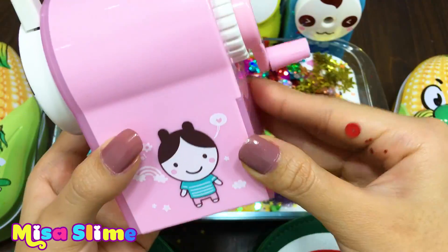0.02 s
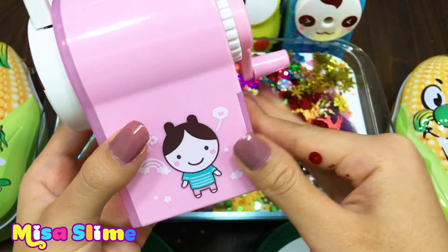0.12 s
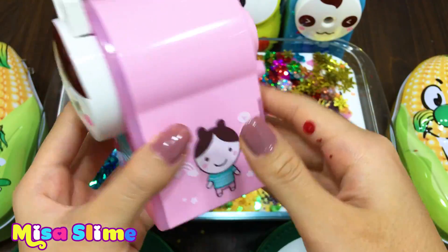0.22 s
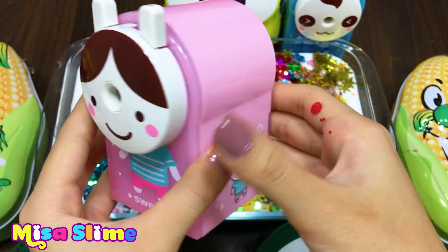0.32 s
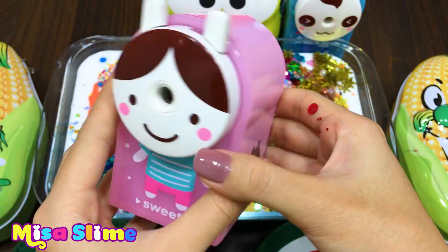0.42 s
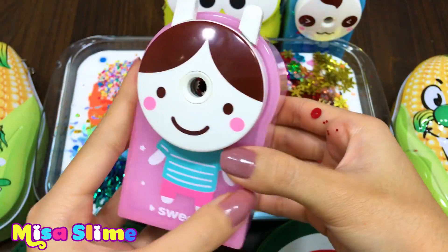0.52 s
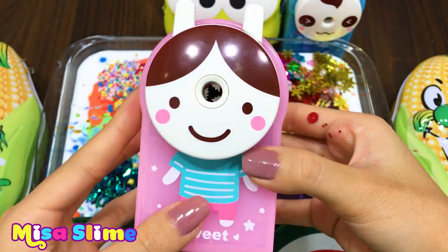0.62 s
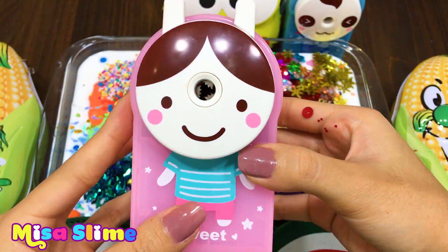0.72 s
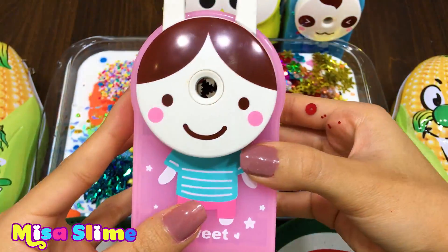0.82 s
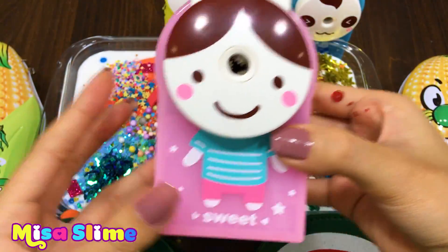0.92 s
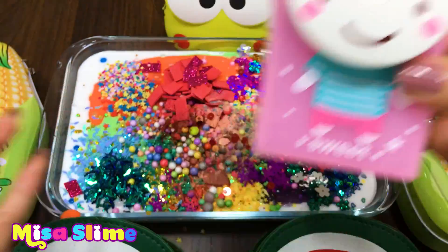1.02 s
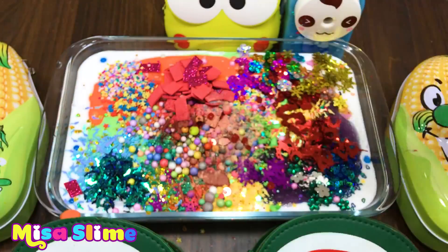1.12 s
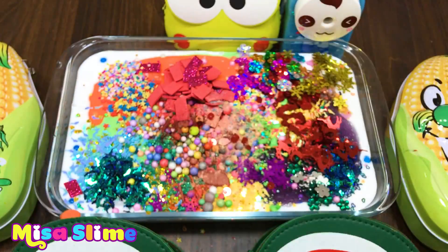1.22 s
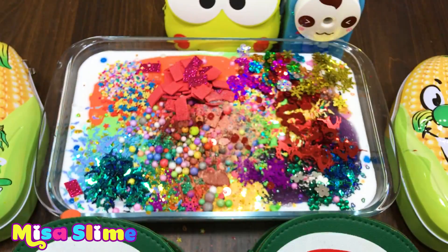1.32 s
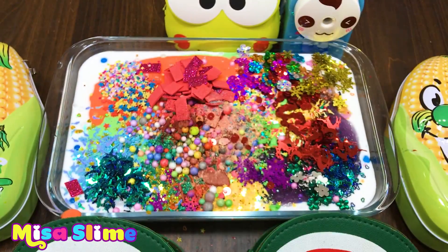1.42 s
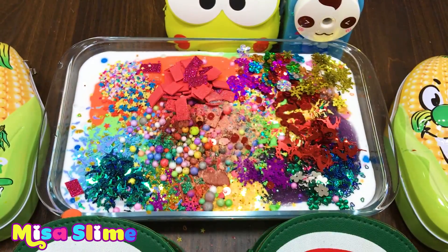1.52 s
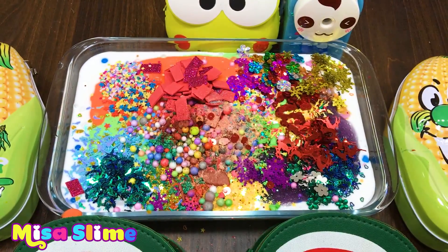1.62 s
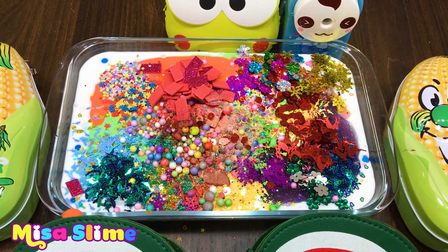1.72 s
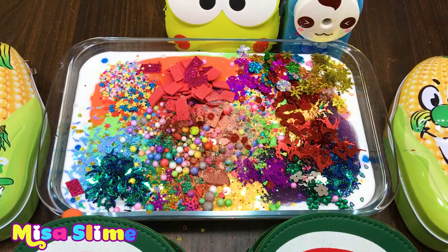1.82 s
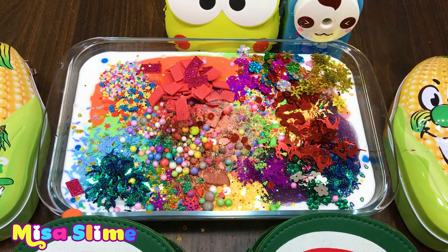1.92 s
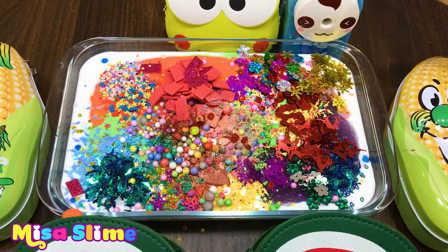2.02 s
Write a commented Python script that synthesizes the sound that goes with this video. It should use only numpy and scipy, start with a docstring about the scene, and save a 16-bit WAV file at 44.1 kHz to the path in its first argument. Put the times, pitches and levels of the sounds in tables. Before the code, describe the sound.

A hollow plastic case is handled close to the microphone in a bare, echoing room. Faint knocks and a slight sliding whistle begin, a quick rattle starts near 0.2 seconds, and a loud, bright snap and knock land at 0.25 to 0.27. Lighter taps, ticks and finger rustles follow from 0.5 to 0.9, fainter ones around 1.2, and small clicks at 1.5 to 1.7, over low rumble and faint hiss.

```python
"""A bare echoing room: hands turn a hollow plastic case close to the microphone and push its drawer shut.
A short rattle, a snap and a knock are heard, then smaller knocks and ticks as it is carried off.
Contacts ring decaying wall and edge modes, and thumps are decaying sines; all of these feed a noise-tap echo.
Resonant noise whistles as the drawer slides, grainy noise makes the fingers rustle,
and shaped noise makes the room's low rumble and faint hiss."""
import sys
import numpy as np
from scipy import signal
from scipy.fft import rfft, irfft
from scipy.io import wavfile
from scipy.ndimage import uniform_filter1d

SR = 44100
rng = np.random.default_rng(int(sys.argv[2]) if len(sys.argv) > 2 else 0)


def gain_from_db(level_db):
    """Convert decibel levels to linear amplitude factors (20 dB per decade)."""
    decades = np.asarray(level_db, float) / 20
    return 10 ** decades


def generate_wav(signal):
    """Clip the signal to [-1, 1] and save it as 16-bit WAV at the path in sys.argv[1]."""
    frames = np.transpose(np.atleast_2d(signal))
    scaled = np.clip(frames, -1, 1) * 32767
    pcm = np.round(scaled).astype(np.int16)
    wavfile.write(sys.argv[1], SR, pcm)


N = 92610  # samples, 2.1 s
LEAD = 22050  # samples kept ahead of the start, so that an earlier knock can still echo


def evened(x):
    """Scales a signal to an rms of one."""
    return x / np.sqrt(np.mean(x ** 2) + 1e-20)


def read(points, hz):
    """Reads a curve of (Hz, value) points along log frequency."""
    f, value = np.transpose(points)
    return np.interp(np.log(hz + 1), np.log(f + 1), value)


def add(mix, start_s, sound):
    """Lays a sound into a mix that begins LEAD samples early."""
    part = mix[LEAD + round(start_s * SR):][:len(sound)]
    part += sound[:len(part)]


def strike(modes, peak_db, hz, patch_db, reach_oct, far_db, chatter_s, crack_db, blur=1):
    """A contact and three weaker rebounds crack, ring the struck patch and the modes near it, each a close triple."""
    crack_fade_s, crack_top_hz = 0.0015, 11000
    patch_cycles = 35  # the patch falls by 60 dB in this many cycles, times blur
    mode_split = 0.018  # largest detuning either way, as a share of the mode frequency
    radiates_above_hz = 650  # thin walls move no air below this
    t = np.arange(1600) / SR

    f, mode_db, t60 = np.transpose(modes * 3)[:, :, None]
    luck = rng.random((len(f) + 4, 2))
    near = np.exp(-.5 * (np.log2(f / hz) / reach_oct) ** 2) + gain_from_db(far_db)
    detune = 1 + 2 * mode_split * (luck[4:, :1] - .5)
    uneven_db = 6 * (luck[4:, 1:] - .5)
    fading = gain_from_db(mode_db + uneven_db - 60 * t / t60 / blur)
    ring = (near * fading * np.sin(2 * np.pi * f * detune * t)).sum(0)

    patch = gain_from_db(patch_db - 60 * t * hz / patch_cycles / blur) * np.sin(2 * np.pi * hz * t)
    crack_band = signal.butter(2, [2500, crack_top_hz], "band", fs=SR, output="sos")
    crack = signal.sosfilt(crack_band, rng.standard_normal(len(t)))
    crack = gain_from_db(crack_db) * np.exp(-t / crack_fade_s) * crack
    touch = ring / abs(ring).max() + patch + crack

    at = np.cumsum(.4 + luck[:4, 0]) * chatter_s * blur * SR
    contacts = np.zeros(int(at[-1]) + 2)
    force = 0.72 ** np.arange(4) * (0.81 + 0.29 * luck[:4, 1])
    np.add.at(contacts, (at - at[0]).astype(int), force)
    radiation = signal.butter(3, radiates_above_hz, "high", fs=SR, output="sos")
    sound = signal.sosfilt(radiation, np.convolve(contacts, touch))
    return gain_from_db(peak_db) * sound / abs(sound).max()


def strikes(direct, sent):
    """Knocks ring the wall modes, ticks and catch snaps the edge modes, each heard directly and through the room."""
    # drawer catch snapping and rebounding: start_s, peak_db, ring_hz, room_share_db (before the lift below)
    snaps = [(0.2448, 2, 10200, -15.5), (0.2445, -1, 10800, -13), (0.2476, -4.5, 10790, -11.5),
             (0.2506, -17, 11500, -10), (0.2742, -12.5, 7870, -12)]
    # knocks on the case walls: start_s, peak_db, struck_region_hz, room_share_db (before the lift)
    knocks = [(.0005, -30, 1690, 2), (.0232, -29, 2000, -3.5), (.0234, -32, 950, 0), (.096, -35, 1050, 1),
              (.1038, -33.5, 1300, -5), (.123, -43, 1290, -7), (.184, -33, 1780, -13),
              (.1925, -26.5, 1306, 4), (.199, -19.5, 2000, -9.5), (.203, -23.5, 2099, -4),
              (.217, -24, 1805, 0), (.2205, -11, 2050, -12), (.2245, -17.5, 1970, 0.5),
              (.231, -24.5, 2043, -9), (.2415, -18, 2032, -36), (.2452, -11, 1114, -7),
              (.2468, -2.5, 1640, -16.5), (.2588, -9, 2379, -11.5), (.2612, -13, 2198, -9),
              (.2718, -8.5, 1292, -17), (.2720, -8, 2820, -11), (.2735, -11, 2227, -7),
              (.2748, -14.5, 1300, -11.5), (.574, -33, 1170, -27), (.584, -35.5, 1520, -11.5),
              (.595, -29.5, 1498, -9.5), (.601, -42, 1570, -2), (.647, -43.5, 1480, -10),
              (.720, -33, 2132, -10), (.740, -48, 1580, -10.5), (.768, -32, 1480, -10.5),
              (.785, -37, 1297, -12.5), (.905, -47.5, 1646, -13.5), (.933, -51, 1404, -25),
              (1.162, -55.5, 1351, 0), (1.183, -55.5, 1100, -11.5), (1.198, -49.5, 2200, -2.5),
              (1.243, -53, 1376, -13.5), (1.257, -47.5, 1338, -9.5), (1.266, -45, 2067, -11.5),
              (1.364, -52, 990, -2), (1.44, -53.5, 1407, 2.5), (1.510, -38, 1586, -1.5),
              (1.550, -38, 1254, -5.5), (1.663, -32.5, 1900, -7.5), (1.676, -42.5, 1930, -2.5),
              (1.691, -39, 1880, -5.5), (1.702, -55, 1930, 5), (1.722, -47.5, 1890, -3)]
    # bright ticks of edges and loose sequins: start_s, peak_db, ring_hz, room_share_db (before the lift)
    ticks = [(.0944, -44.5, 5200, 4), (.139, -38.5, 6240, -11.5), (.1435, -37.5, 6300, -9),
             (.1518, -35.5, 6540, -2), (.1918, -35, 4900, -10), (.199, -32, 4500, 2),
             (.2208, -26, 5433, -2.5), (.237, -30, 5760, -10), (.2588, -20, 4040, -25),
             (.2718, -16, 3817, -12.5), (.526, -43, 11500, -10), (.574, -44, 5130, -20),
             (.601, -32.5, 6900, -5.5), (.720, -35.5, 4600, -13.5), (.740, -47, 4500, -10.5),
             (.768, -50.5, 5100, -8), (.7845, -26.5, 6120, -12.5), (.785, -34, 4200, -4),
             (.931, -48, 4100, -15), (.932, -45.5, 9020, -15), (1.1614, -60, 4570, -3),
             (1.2425, -44, 11480, -13.5), (1.257, -45.5, 5350, -17), (1.257, -45, 11500, -12),
             (1.268, -48, 4053, -13.5), (1.510, -32, 8080, -5), (1.543, -41, 4380, -6),
             (1.663, -39, 4820, -9.5), (1.663, -34, 9300, -4), (1.689, -46, 7130, -3),
             (2.0834, -72.5, 5320, -9.5)]
    # wall modes of the case: pitch_hz, relative_level_db, t60_s (before blur)
    walls = [(640, -17, 0.024), (950, -25, .03), (1103, -4.8, 0.024), (1160, -0.5, 0.03),
             (1480, -3.1, 0.016), (1640, 9.5, 0.012), (1920, 10, 0.021), (2154, 13, 0.023),
             (2620, 9.5, 0.013), (2860, 7.5, 0.0075)]
    # edge modes: pitch_hz, relative_level_db, t60_s (before blur)
    edges = [(3330, 0, 0.0026), (4200, 4.5, 0.019), (4920, 4.5, .007), (5400, -3.5, 0.0062),
             (5900, 4.5, 0.005), (6724, 5.5, 0.011), (7700, -3.5, 0.002), (8600, -4.5, 0.0055),
             (9200, -2, 0.005), (10860, -1, 0.0054), (10400, -2.5, 0.0059), (12500, -4, 0.0017),
             (13600, -9, .005), (15000, -6.5, .005)]
    knock = dict(far_db=-21.5, chatter_s=.0012, crack_db=-26)
    tick = dict(far_db=-18.5, chatter_s=.0006, crack_db=-10.5)
    knock_reach_oct, tick_reach_oct = 0.3, 0.063
    patch_db, room_patch_db = -8.5, -6
    room_lift_db = 2.5
    # the room hears all sides of the case: more modes, less distinct
    room_reach, room_blur = 1.7, .45

    # a knock just before the start, heard through the room alone
    earlier_s = 0.38
    add(sent, -earlier_s, strike(walls, -12, 2000, patch_db, knock_reach_oct, **knock))
    add(sent, -earlier_s, strike(edges, -22, 5700, patch_db, tick_reach_oct, **tick))

    kinds = (knocks, walls, knock_reach_oct, knock), (ticks + snaps, edges, tick_reach_oct, tick)
    for rows, modes, reach_oct, touch in kinds:
        for start_s, peak_db, hz, room_share_db in rows:
            add(direct, start_s, strike(modes, peak_db, hz, patch_db, reach_oct, **touch))
            sent_db = peak_db + room_share_db + room_lift_db
            wide_oct = room_reach * reach_oct
            add(sent, start_s, strike(modes, sent_db, hz, room_patch_db, wide_oct, **touch, blur=room_blur))


def thumps(direct, sent):
    """The whole case thumps dully in the hand: low sines with a quick onset and an even decay."""
    # start_s, level_db (before onset, decay and low cut), pitch_hz
    thump_rows = [(0.199, -42, 460), (0.222, -33, 420.3), (0.244, -25, 445.3), (0.271, -18, 268),
                  (0.538, -40, 294), (0.576, -34.5, 308), (0.6, -41.5, 274), (0.766, -43.5, 340),
                  (0.785, -46.5, 440), (0.914, -61.5, 254.6)]
    t60_s, onset_s = .028, 0.001
    t = np.arange(6000) / SR
    low_cut = signal.butter(2, 140, "high", fs=SR, output="sos")
    for start_s, level_db, hz in thump_rows:
        sound = gain_from_db(level_db - 60 * t / t60_s) * np.sin(2 * np.pi * hz * t)
        sound = signal.sosfilt(low_cut, sound * np.minimum(t / onset_s, 1))
        add(direct, start_s, sound)
        add(sent, start_s, gain_from_db(-10) * sound)


def case():
    """Every knock, tick, snap and thump of the case, once as heard directly and once as sent to the room."""
    direct, sent = np.zeros((2, LEAD + N))
    strikes(direct, sent)
    thumps(direct, sent)
    return direct, sent


def slide():
    """The sliding drawer makes the hollow whistle faintly: noise through one gliding resonance, applied twice."""
    # start_s, level_db (before the trim), pitch_hz
    glide = [(0, -39, 2010), (.026, -37, 1920), (.056, -49.5, 1986), (.174, -51.5, 2000),
             (.19, -37.5, 2050), (.204, -35.5, 2080), (.212, -48, 2030), (.224, -33.5, 1980),
             (.24, -45, 1970)]
    width_hz, trim_db = 140, -2.5  # width of a single pass
    start_s, level_db, pitch_hz = np.transpose(glide)
    t = np.arange(int(start_s[-1] * SR)) / SR
    turn = np.exp(2j * np.pi * np.cumsum(np.interp(t, start_s, pitch_hz)) / SR)
    r = np.exp(-np.pi * width_hz / SR)
    # the noise is turned down to 0 Hz, narrowed there, and turned back up to the moving pitch
    narrow = signal.lfilter([1], np.convolve([1, -r], [1, -r]), rng.standard_normal(len(t)) / turn)
    whistle = evened((turn * narrow).real)
    level = gain_from_db(trim_db + np.interp(t, start_s, level_db))
    return np.pad(level * whistle, (0, N - len(t)))


def rubs():
    """Fingers slide on plastic: dense tiny slips over a smooth hiss, in short strokes of their own brightness."""
    # start_s, length_s, level_db (rms before stroke shape and unevenness), centre_hz
    strokes = [(0.083, .012, -61, 7900), (0.141, .026, -59.5, 6000), (0.463, 0.12, -53.5, 10060),
               (0.589, .025, -58.5, 7660), (0.719, 0.063, -67, 8960), (0.891, .025, -64, 11000),
               (1.358, 0.028, -68, 5900), (1.438, 0.04, -66.5, 9400), (1.664, 0.057, -58, 7500),
               (1.716, 0.095, -64, 977), (2.057, .03, -82, 9110)]
    grains_per_s, grain_db = 9000, 2.5
    smooth = 1  # hiss against slips
    width_oct, fade_s, uneven_db = 0.77, .006, 3

    size = gain_from_db(grain_db * np.minimum(rng.exponential(1, N), 5)) * rng.standard_normal(N)
    slips = evened(size * (rng.random(N) < grains_per_s / SR))
    spectrum = rfft(slips + smooth * rng.standard_normal(N))
    hz = np.fft.rfftfreq(N, 1 / SR) + 1
    t = np.arange(N) / SR
    out = np.zeros(N)
    for start_s, length_s, level_db, centre_hz in strokes:
        colour = np.exp(-.5 * (np.log2(hz / centre_hz) / width_oct) ** 2)
        rise = (t - start_s) / (0.14 * length_s)
        fall = (start_s + length_s - t) / fade_s
        stroke = np.clip(np.minimum(rise, fall), 0, 1)
        out += gain_from_db(level_db) * stroke * evened(irfft(spectrum * colour, N))
    wander = uniform_filter1d(uniform_filter1d(rng.standard_normal(N), size=300), size=300)
    return out * gain_from_db(uneven_db * evened(wander))


def room(sent):
    """Sparse taps of random sign build up after a short gap, each band dying at its own speed."""
    # decay of the echo: pitch_hz, t60_s
    decay = [(150, 0.94), (400, 0.88), (1000, 0.88), (2000, 0.77), (4000, 0.75), (8000, 0.64),
             (11000, 0.49), (15000, 0.49)]
    gap_s, build_s = 0.00057, 0.0042
    taps = np.zeros(SR)
    at = np.arange(0, SR - 12, 12) + rng.integers(0, 12, (SR - 1) // 12)
    taps[at] = rng.choice([-1., 1.], len(at))
    hz, t, z = signal.stft(taps, SR, nperseg=256)
    fading = gain_from_db(-60 * t / read(decay, hz)[:, None])
    tail = signal.istft(z * fading, SR, nperseg=256)[1]
    tail = tail * np.clip((np.arange(len(tail)) / SR - gap_s) / build_s, 0, 1)
    return signal.fftconvolve(sent, tail / np.linalg.norm(tail))[:len(sent)]


def hush():
    """Noise shaped into a slowly swelling low rumble and the faint hiss of the room, in drifting patches."""
    # colour of the background: pitch_hz, relative_level_db (per Hz)
    colour = [(20, -25.5), (35, -15), (50, -6), (70, 0.8), (100, -3), (160, -10), (280, -9), (450, -13),
              (900, -25), (2000, -22.5), (4300, -25.5), (12000, -30), (14000, -32.5), (15800, -31),
              (16400, -41.5)]
    level_db, patchy_db = -64, 2.5
    swell_db, swell_below_hz = 3.6, 150
    frames, hz = N // 256 + 5, np.fft.rfftfreq(1024, 1 / SR)
    a, b, patches = rng.standard_normal((frames, 513, 3)).T
    swell = evened(uniform_filter1d(patches[0], 25)) * swell_db * (hz < swell_below_hz)[:, None]
    patches = evened(uniform_filter1d(uniform_filter1d(patches, 10, 0), 12, 1))
    z = (a + 1j * b) * gain_from_db(read(colour, hz)[:, None] + patchy_db * patches + swell)
    noise = signal.istft(z, nperseg=1024, noverlap=768)[1][:N]
    return gain_from_db(level_db) * evened(noise)


def scene():
    """The case and its echo, the sliding drawer, the fingers and the hush, in one channel."""
    direct, sent = case()
    case_in_room = (direct + room(sent))[LEAD:]
    return (case_in_room + slide() + rubs() + hush())[None]


def roll_off(x):
    """The treble ends steeply here."""
    return signal.sosfilt(signal.butter(12, 16520, fs=SR, output="sos"), x)


def record(dry):
    """The microphone clips at full scale, then loses the lowest bass and the highest treble."""
    low_hz, top_hz = 45, 16000
    low_cut = signal.butter(2, low_hz, "high", fs=SR, output="sos")
    heard = signal.sosfilt(low_cut, np.clip(dry, -1, 1))
    top_cut = signal.firwin(301, top_hz, window=("kaiser", 9), fs=SR)
    heard = signal.oaconvolve(heard, top_cut[None], "same")
    return roll_off(heard)


dry = scene()
out = record(dry)
generate_wav(out)
```